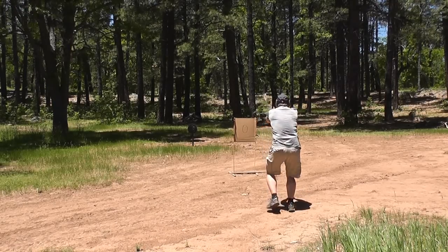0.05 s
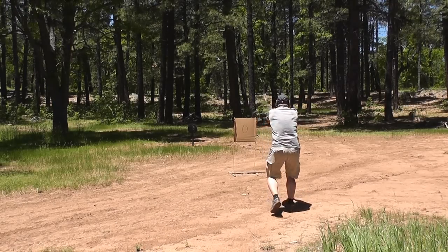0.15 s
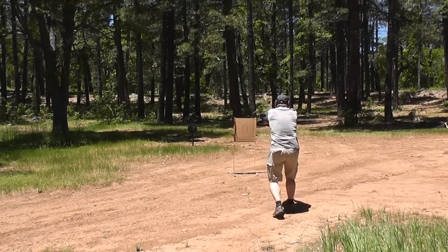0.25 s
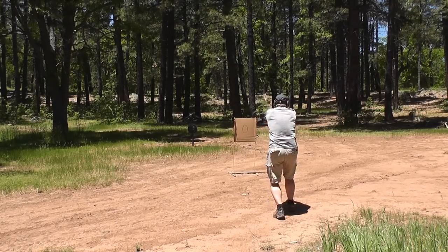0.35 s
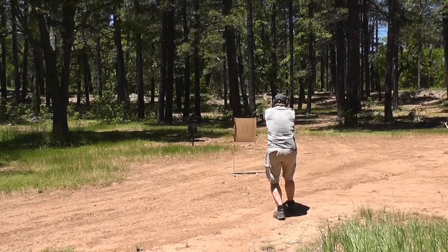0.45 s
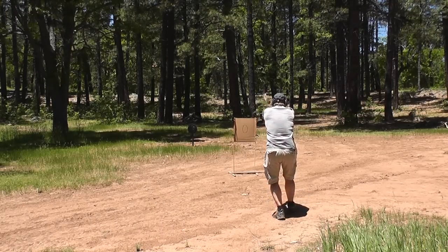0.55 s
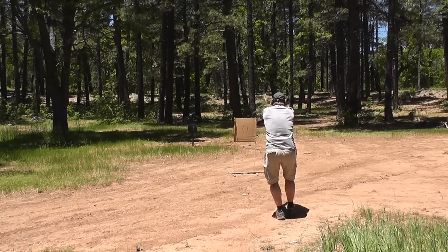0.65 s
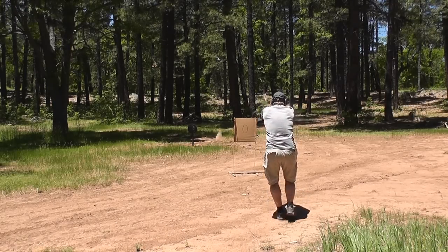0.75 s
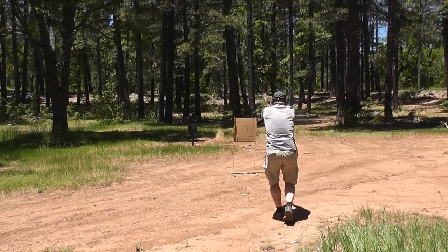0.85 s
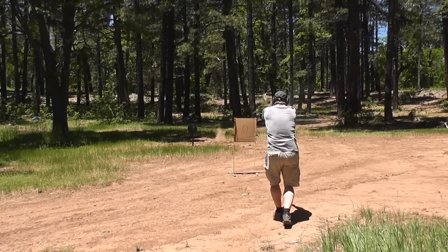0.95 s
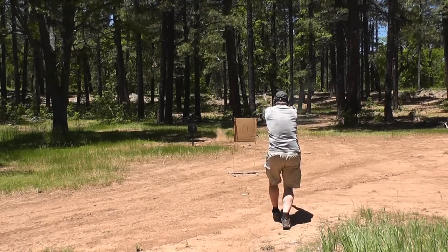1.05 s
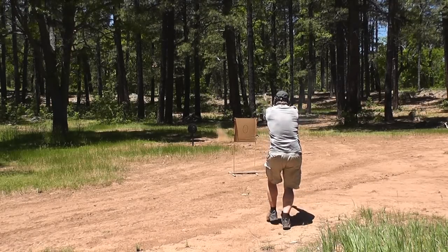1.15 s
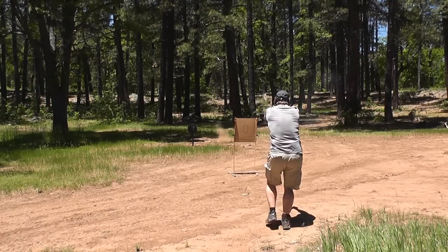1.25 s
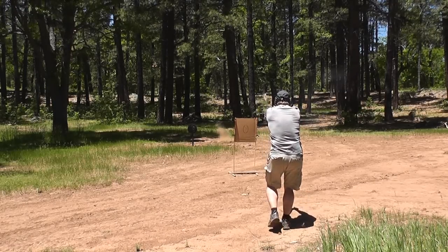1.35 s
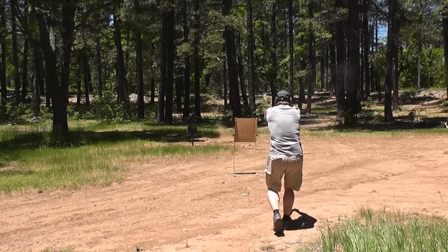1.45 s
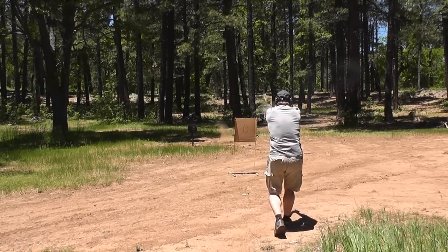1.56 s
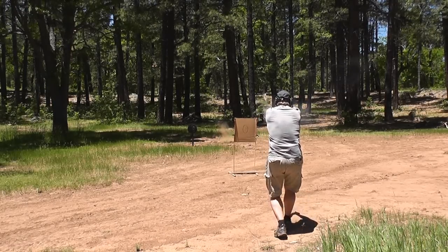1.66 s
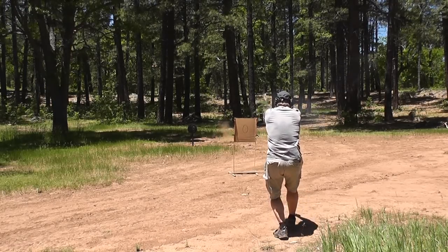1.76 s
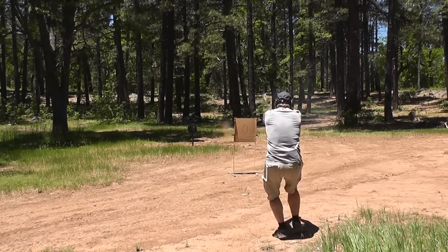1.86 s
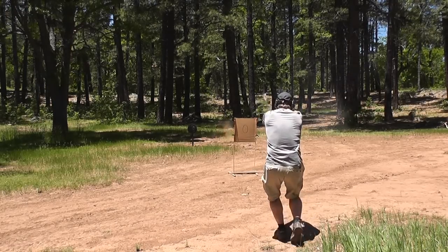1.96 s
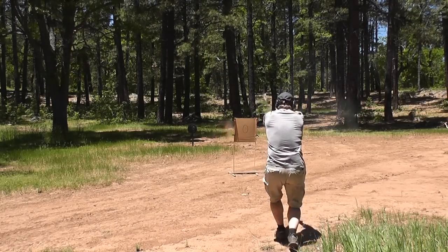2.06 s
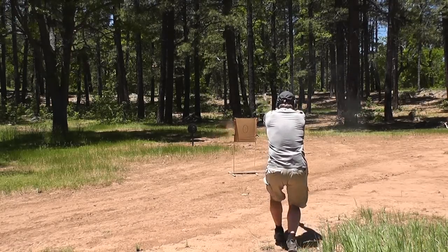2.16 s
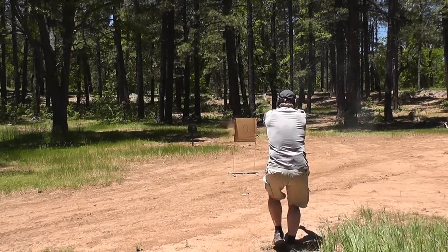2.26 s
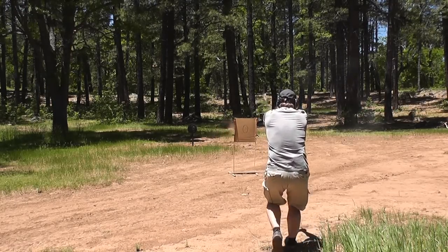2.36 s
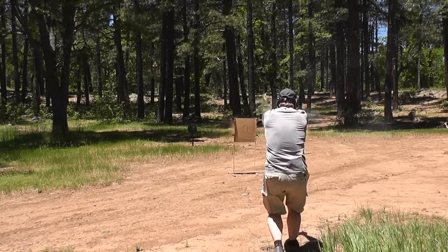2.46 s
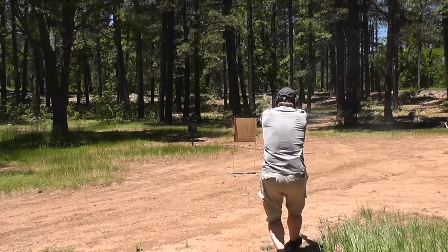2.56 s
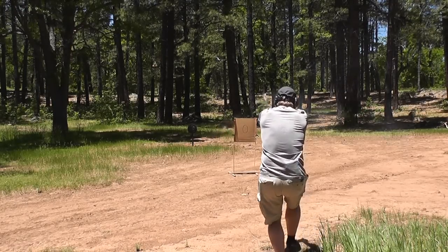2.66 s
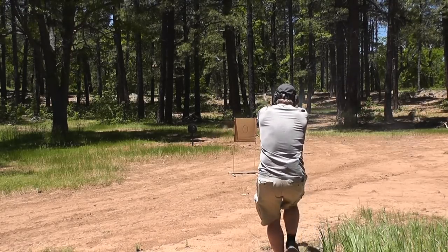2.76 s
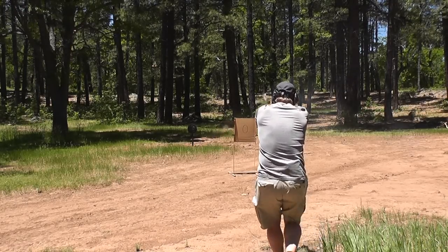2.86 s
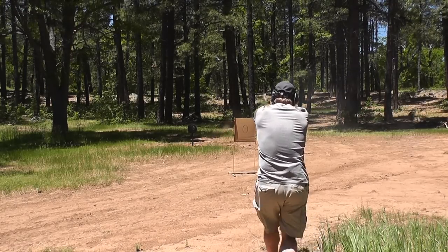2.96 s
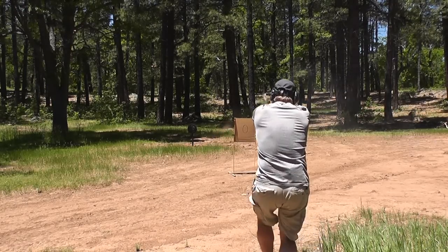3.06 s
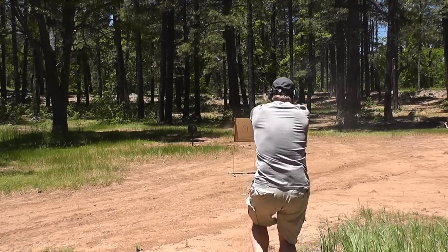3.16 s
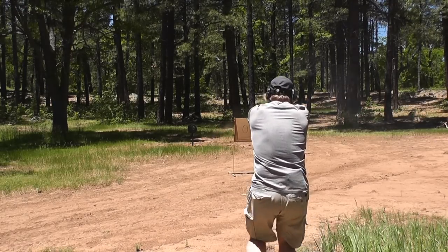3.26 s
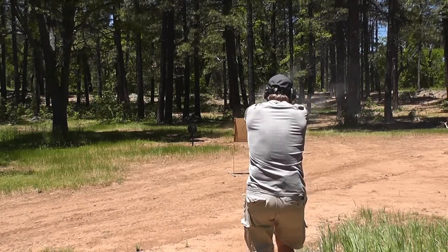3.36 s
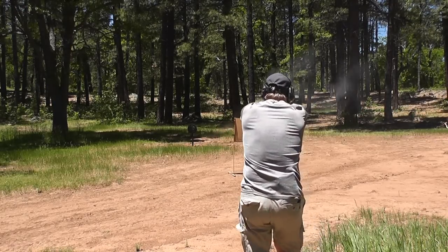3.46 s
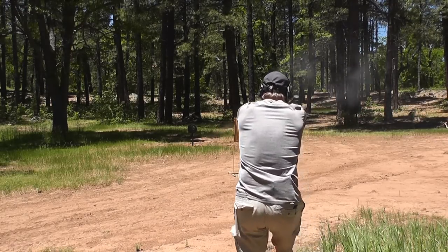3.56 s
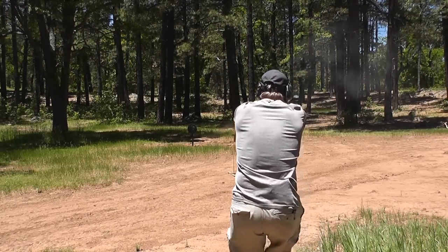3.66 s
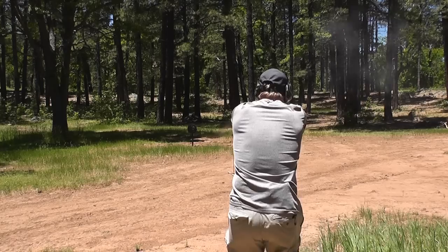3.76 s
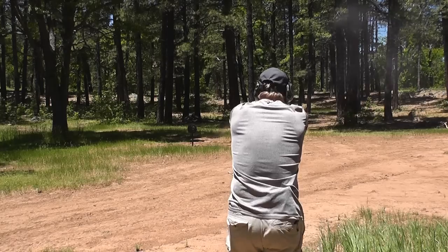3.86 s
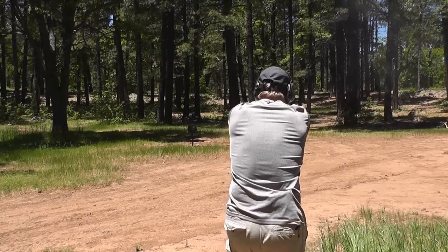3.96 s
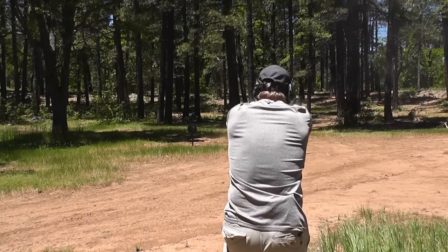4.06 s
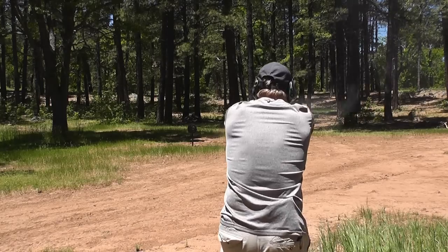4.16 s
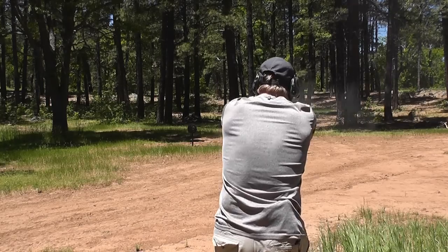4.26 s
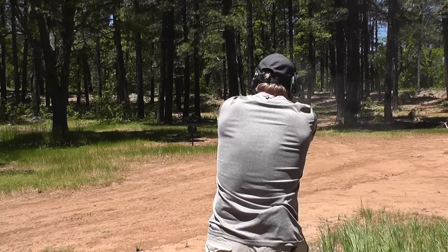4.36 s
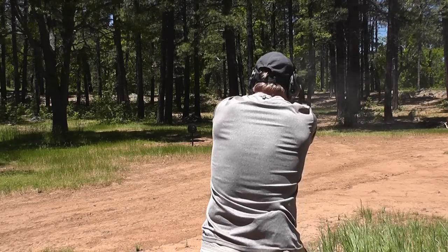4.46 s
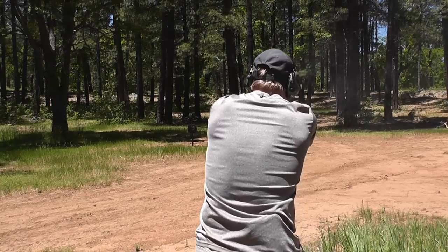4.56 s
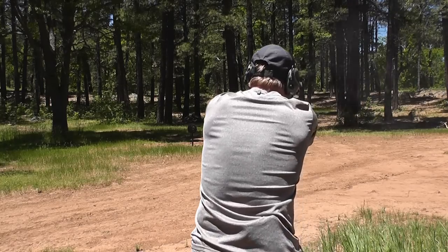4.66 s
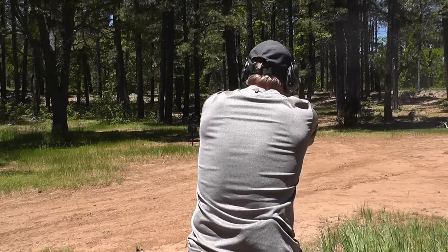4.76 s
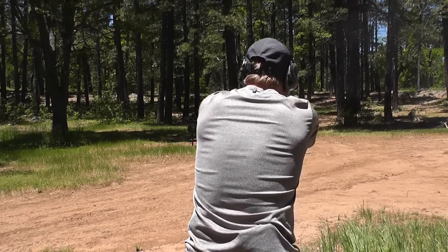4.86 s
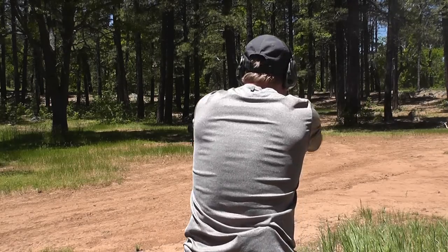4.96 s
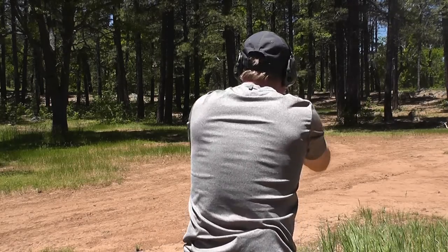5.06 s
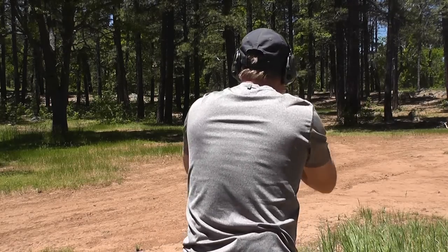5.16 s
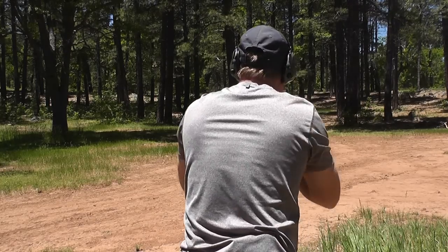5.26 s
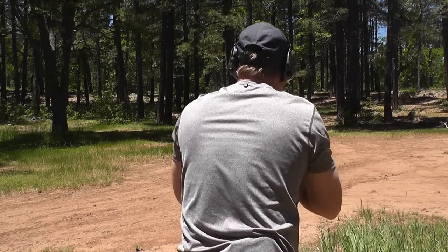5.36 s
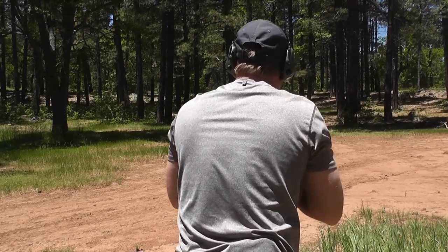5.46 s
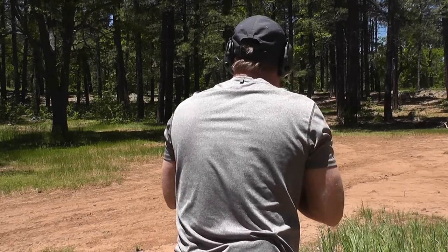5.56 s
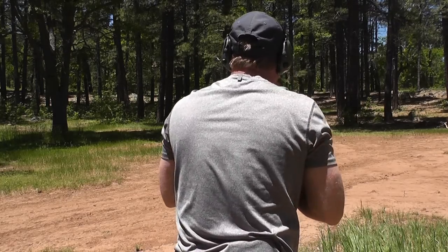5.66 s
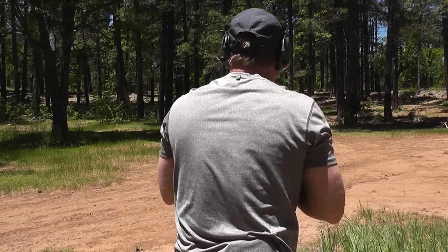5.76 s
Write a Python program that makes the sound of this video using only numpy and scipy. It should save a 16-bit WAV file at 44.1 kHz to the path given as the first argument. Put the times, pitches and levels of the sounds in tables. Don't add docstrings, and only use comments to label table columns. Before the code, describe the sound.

Five dry, clipped gunshots, recorded outdoors on a small camera microphone that ducks after every blast and then recovers. Uneven echoes from trunks swell and decay, each tail cut by the next shot. Soft wind, low buffeting on the microphone and crunching steps fill the gaps; a quick bird trill comes before the first shot, and the last echo fades under near scuffs and cloth rustle.

```python
import sys
import numpy as np
from scipy import signal
from scipy.fft import rfft, irfft
from scipy.io import wavfile
from scipy.ndimage import uniform_filter1d

SR = 44100
rng = np.random.default_rng(int(sys.argv[2]) if len(sys.argv) > 2 else 0)


def wav_out(sig):
    wavfile.write(sys.argv[1], SR, np.round(np.clip(np.atleast_2d(sig).T, -1, 1) * 32767).astype(np.int16))


def voltage_ratio(level):
    return 10 ** (np.asarray(level, float) / 20)


N = 256088
T = np.arange(N) / SR
GRAIN_DECAY_S = 0.00062

FIRED = [
    .7286,
    1.6411,
    2.4856,
    3.3922,
    4.1728,
]


def evened(x):
    return x / np.sqrt(np.mean(x ** 2) + 1e-20)


def read(points, hz):
    f, value = np.transpose(points)
    return np.interp(np.log(hz + 1), np.log(f + 1), value)


def add(mix, s, sound):
    part = mix[:, round(s * SR):][:, :sound.shape[-1]]
    part += sound[..., :part.shape[1]]


def panned(x, pan_db):
    return x * voltage_ratio(np.array([[pan_db / 2], [-pan_db / 2]]))


def coloured(x, points):
    hz = np.fft.rfftfreq(x.shape[-1], 1 / SR)
    return irfft(rfft(x) * voltage_ratio(read(points, hz)), x.shape[-1])


def paired(points, a, b):
    same = np.clip(read(points, np.fft.rfftfreq(len(a), 1 / SR)), -1, 1)
    mid = rfft(a) * np.sqrt(1 + same)
    side = rfft(b) * np.sqrt(1 - same)
    return irfft(np.array([mid + side, mid - side]), len(a)) / np.sqrt(2)


def since_shot():
    return np.min([np.where(T > s, T - s, 9) for s in FIRED], axis=0)


def breeze():
    # frequency in Hz, level in dB.
    pines = [(53, -28), (90, -9), (210, -5.5), (316, -4.5), (345, -2.5), (786, -2), (858, -3.5),
             (2480, -21), (4360, -28), (4860, -32.5), (16000, -48)]
    level_db = -43.5
    a, b, u = rng.standard_normal((3, N))
    hush = evened(coloured(paired([(100, 0.72), (1000, 0.88), (8000, 0.9)], a, b), pines))
    gusts_db = 2.0 * evened(uniform_filter1d(uniform_filter1d(u, 3000), 3000))
    duck_db = np.maximum(25 - 22 * since_shot(), 0)
    hiss = voltage_ratio(-84) * coloured(np.array([a, b])[:, ::-1], [(3000, -5), (13000, -6), (15000, -15)])
    return hush * voltage_ratio(level_db + gusts_db - duck_db) + hiss


def rumble():
    # centre in seconds, level in dB, length in seconds.
    gusts = [
        (0.182, -40, .06),
        (.68, -53, .05),
        (1.56, -56, .07),
        (2.107, -39, 0.26),
        (2.405, -32, 0.13),
        (3.096, -40.5, 0.18),
        (4.11, -59, .05),
        (4.72, -52, .1),
        (4.99, -41, .07),
        (5.45, -43, 0.26),
    ]
    calm_db = -54
    level = voltage_ratio(calm_db) + sum(voltage_ratio(db) * np.exp(-((T - s) / length) ** 2) for s, db, length in gusts)
    eddies = paired([(50, -0.78), (200, -0.33)], *rng.standard_normal((2, N)))
    lumps = coloured(eddies, [(15, -31), (40, -11), (80, -3.0), (130, -11), (300, -67)])
    return evened(lumps) * level * voltage_ratio(-12.0)


def rustle():
    # time in seconds, level in dB.
    walk = [(0, -62.5), (.34, -95), (.6, -73), (1.3, -78), (1.63, -71), (2.2, -63), (2.47, -74),
            (3.08, -65), (3.38, -58), (3.79, -63), (3.94, -59.5), (4.16, -63), (4.65, -60), (4.75, -69),
            (4.95, -60.5), (5.3, -58), (5.8, -66.5)]
    # start in seconds, length in seconds, level in dB.
    scuffs = [(0, 0.011, -49), (0.324, 0.02, -46.5), (0.38, 0.023, -62), (0.588, 0.051, -54),
              (1.452, 0.012, -48), (1.598, 0.013, -49), (2.08, 0.062, -38.5), (2.248, 0.017, -58.5),
              (2.387, 0.079, -63), (2.99, 0.034, -44), (3.035, 0.047, -55), (3.166, 0.015, -54),
              (3.237, 0.023, -49), (3.284, 0.035, -56), (3.328, 0.2, -51.5), (3.748, 0.013, -63),
              (3.776, .015, -44), (3.885, 0.039, -45), (3.936, 0.044, -47), (4.065, 0.16, -68),
              (4.622, 0.066, -52), (4.797, 0.055, -59), (4.963, 0.088, -49.5), (5.13, 0.083, -53),
              (5.213, 0.1, -59), (5.06, .06, -64), (5.49, .15, -80), (5.682, 0.03, -42), (5.72, 0.062, -53)]
    # frequency in Hz, level in dB.
    far_grit = [(1470, -37), (2500, -19), (2790, 2.5), (3800, 2), (4910, -4), (6450, 2.5), (8000, -3.5),
                (9500, -3), (11900, -3), (14000, -8), (16000, -12)]
    # frequency in Hz, level in dB.
    near_cloth = [(2060, -38), (3500, -11), (4240, -17), (4780, -2), (5500, 1), (7800, -7), (9300, 0.5),
                  (12000, -10), (14000, -3), (16000, -7)]
    duck_db, duck_s = 40, 0.3
    close_from_s, close_by_s = 3.8, 5.7
    crackles_per_s, crackle_db = 55, 8.5

    level = voltage_ratio(np.interp(T, *np.transpose(walk)) - duck_db * (since_shot() < duck_s))
    for s, length, db in scuffs:
        times = [s, s + 0.0043, s + 0.7 * length, s + 1.38 * length]
        level = level + voltage_ratio(db) * np.interp(T, times, [0.0012, 0.5, 0.55, 0.0002])
    a, b, u = rng.standard_normal((3, N))
    clumps = voltage_ratio(3.3 * evened(uniform_filter1d(u, 45)))
    raw = paired([(3000, 1.0), (9500, 1.0), (13000, 0.96)], a, b) * clumps
    close = np.interp(T, [close_from_s, close_by_s], [0, 1])
    distant_grains = evened(coloured(raw, [(1200, -40)] + far_grit))
    close_grains = evened(coloured(raw, [(1500, -30)] + near_cloth))
    grains = (1 - close) * distant_grains + close * close_grains
    ticks = (rng.random(N) < crackles_per_s / SR) * rng.uniform(0.18, 1, N) * level
    bursts = signal.lfilter([voltage_ratio(crackle_db)], [1, -np.exp(-1 / (GRAIN_DECAY_S * SR))], ticks)
    return evened(grains) * (uniform_filter1d(level, 100) + bursts) * voltage_ratio(1.5)


def note(s, length, start_hz, end_hz, db):
    u = np.linspace(0, 1, round(length * SR))
    bend = 2.5 if end_hz > start_hz else 1.1
    hz = start_hz + (end_hz - start_hz) * (1 - (1 - u) ** bend)
    db = db + 1.2 * evened(uniform_filter1d(rng.standard_normal(len(u)), size=40))
    whistle = np.sin(2 * np.pi * np.cumsum(hz) / SR)
    return s, panned(voltage_ratio(db) * whistle * np.sin(np.pi * u) ** 0.7, 5.6)


def snap(s, db, hz):
    t = np.arange(512) / SR
    band = np.exp(-((np.fft.rfftfreq(512, 1 / SR) / hz - 1) / 0.16) ** 2) + 0.27
    noise = irfft(rfft(rng.standard_normal(512)) * band)
    tick = coloured(noise, [(hz / 5, -30), (hz / 2.3, 0)])
    fade = np.exp(-t / GRAIN_DECAY_S)
    loudness = voltage_ratio(db - 4.5) * np.sqrt(np.mean(fade ** 2))
    return s, panned(loudness * evened(tick * fade), 2.0 * rng.standard_normal())


def puff(s, db, hz, length):
    t = np.arange(4096) / SR
    low = [(hz / 8, -50), (hz / 3, -20), (hz, 0)]
    high = [(hz * 3, -12), (hz * 12, -34), (max(16000, hz * 13), -50)]
    thud = coloured(rng.standard_normal(4096), low + high)
    return s, voltage_ratio(db) * evened(thud) * np.clip(t / 0.0064, 0, 1) * np.exp(-(t / length) ** 2)


def blast(s, db, length, shock_db, near_db, pan_db, ground_s, ground_db):
    # frequency in Hz, level in dB.
    slam_spectrum = [(120, -34), (200, -5), (558, -21), (800, -1.5), (1020, 1), (1500, -1), (3020, -12.5),
                     (5840, -11), (11700, -29), (16000, -15.5)]
    # frequency in Hz, level in dB.
    tail_spectrum = [(120, -22), (200, -6), (440, 6.5), (1910, 1.5), (5330, -9.5), (6760, -3),
                     (8740, -10.5), (12200, -7), (16000, -23)]
    lead_s = .003
    t = np.arange(2048) / SR - lead_s
    a, b, c, d = rng.standard_normal((4, len(t)))

    pressure = paired([(1500, 0.037), (5000, 0.99), (9000, 0.96), (13000, .6)], a, b)
    slam = np.tanh(0.5 * evened(coloured(pressure, slam_spectrum))) / 0.67
    slam *= np.interp(t, [0, .0003, length, length + 0.0012], [0, 1, 1, 0])

    sizzle = np.diff(uniform_filter1d(c, size=3), prepend=0)
    lead = voltage_ratio(-18) * np.clip(1 + t / 0.0019, 0, 1) * (t < 0)
    lead_hiss = evened(uniform_filter1d(sizzle, size=6)) * lead
    crack = voltage_ratio(shock_db) * np.sin(2 * np.pi * 6200 * t) * np.exp(-abs(t - .0002) / 0.00011)
    shock = voltage_ratio(shock_db) * np.exp(-np.maximum(t, 0) / 0.0006) * (t >= 0)
    shock = shock + voltage_ratio(ground_db) * np.exp(-((t - ground_s) / 0.00047) ** 2)

    near = evened(coloured(paired([(500, 0.63), (9000, 0.86)], c, d), tail_spectrum))
    dull = coloured(near, [(4000, -1.5), (9000, -3)])
    near = dull + (near - dull) * voltage_ratio(-500 * np.maximum(t - length, 0))
    near *= voltage_ratio(near_db - 625 * (t - length)) * np.clip((t - length + 0.00236) / 0.00018, 0, 1)
    hiss = lead_hiss + evened(sizzle) * voltage_ratio(-1.5) * shock
    return s - lead_s, panned(voltage_ratio(db) * slam, pan_db) + hiss + crack + near


def swing(s, ring_s, kick_db, slow_db, slow_hz, slow_s, ring_db, ring_hz, pan_db):
    t = np.arange(2048) / SR
    late = np.maximum(t - slow_s, 0)
    slow = -voltage_ratio(slow_db) * np.sin(2 * np.pi * slow_hz * late) * np.exp(-late / 0.0034)
    slow = signal.lfilter(*signal.butter(1, 40 / (SR / 2), "high"), slow)
    ring = voltage_ratio(ring_db) * np.cos(2 * np.pi * ring_hz * (t - ring_s))
    ring *= np.clip(1 + (t - ring_s) / 0.00075, 0, 1)
    ring *= np.exp(-(np.maximum(t - ring_s, 0) * ring_hz / 0.99) ** 3)
    kick = -voltage_ratio(kick_db) * np.sin(2 * np.pi * np.minimum(230 * t, 1))
    return s, panned(slow, -3.5) + ring * voltage_ratio(np.array([[pan_db], [0]])) + kick * np.array([[1], [-.2]])


def returning(late, edge_db, swell_db, fall_db, rise_s):
    clearing_db, clearing_rise_db_per_s, edge_fall_db_per_s = -35, 102, 260
    swell_from_db, swell_s = -7, 0.11
    stand_s, stand_step_db = 0.23, -1
    thin_s, thin_db_per_s = 0.65, 10.5
    on = np.clip(1 + late / rise_s, 0, 1) ** 1.7
    clearing = voltage_ratio(clearing_db + clearing_rise_db_per_s * np.minimum(late, 0))
    edge = voltage_ratio(edge_db - edge_fall_db_per_s * np.maximum(late, 0))
    far = np.maximum(late - stand_s, 0)
    swell = swell_db + swell_from_db * np.clip(1 - late / swell_s, 0, 1)
    swell = swell + stand_step_db * np.minimum(far / 0.029, 1)
    swell = voltage_ratio(swell - fall_db * far - thin_db_per_s * np.maximum(late - thin_s, 0))
    return (1 - on) * clearing + on * np.hypot(edge, swell)


def woods(shot, until, air_share, trees_s, *levels):
    # frequency in Hz, level in dB.
    tree_line = [(35, -64), (60, -16), (207, -13), (408, -8.5), (682, -2), (822, -4), (991, -1.5),
                 (1850, -5), (2520, -14), (2900, -8), (3760, -11), (4640, -15), (5720, -17), (10800, -25.5),
                 (16000, -35)]
    # frequency in Hz, loss in dB per second of path.
    air_loss = [(100, 1.5), (300, 8.5), (800, -2.5), (1500, 3), (2000, 13.5), (3000, 21), (5000, 56),
                (8000, 93), (13000, 119), (16000, 200)]
    # frequency in Hz, left-right likeness (-1 to 1).
    likeness = [(60, -1.24), (180, 0.51), (550, 0.83), (1650, 0.66), (3500, 0.88), (5000, 0.96),
                (7500, .997), (10500, 0.96), (13000, 0.56), (15000, 0.49)]
    t = np.arange(shot + .015, until, 1 / SR)
    a, b, u = rng.standard_normal((3, len(t)))
    uneven_db = 1.3 + 2.1 * np.exp(-(t - shot) / .35)
    size = voltage_ratio(uneven_db * evened(uniform_filter1d(u, 60)))
    size /= np.sqrt(uniform_filter1d(size ** 2, 1500))
    pair = paired(likeness, a, b)
    hz, at, z = signal.stft(np.array([pair * size, pair * size ** .3]), SR, nperseg=512, noverlap=384)
    leafy = np.clip(read([(3000, 0.091), (7000, 0.87)], hz), 0, 1)[:, None]
    z = (1 - leafy) * z[0] + leafy * z[1]
    path = np.maximum(at - .09, 0)
    path /= 1 + path / 11.5
    shape = voltage_ratio(read(tree_line, hz)[:, None] - read(air_loss, hz)[:, None] * path * air_share)
    shape /= np.sqrt((shape[6:24] ** 2).sum(0) / len(hz))
    wash = signal.istft(z * shape, SR, nperseg=512, noverlap=384)[1][:, :len(t)]
    wash = coloured(wash, [(50, -40), (110, 1)])
    level = returning(t - shot - trees_s, *levels)
    return t[0], wash * level * signal.windows.tukey(len(t), .006)


def trunk(s, db, hz, pan_db, bright=0.2):
    t = np.arange(300) / SR
    peak_s = .0006
    shape = (t / peak_s) * np.exp(1 - t / peak_s)
    edge = bright * uniform_filter1d(uniform_filter1d(rng.standard_normal(len(t)), size=4), size=3)
    ring = 0.27 * np.sin(2 * np.pi * hz * t) * np.exp(-t / 0.0025) * np.clip(1 - t / t[-1], 0, 1)
    slap = (np.cos(2 * np.pi * hz * (t - peak_s)) + edge) * shape
    echo = np.pad(coloured(slap + ring, [(200, -45), (600, 0.5)]), (0, 600))
    echo = signal.lfilter(*signal.butter(2, 200 / (SR / 2), "high"), echo)
    return s, panned(voltage_ratio(db + 2.5) * echo, pan_db)


def shots(mix):
    # overload in dB, its length in seconds, shock in dB, near tail in dB, pan in dB.
    blasts = [(-10.5, 0.0039, -7.5, -16, -1), (-13, 0.00353, -13, -16, 6), (-5, 0.0033, -10, -18.5, 2),
              (-7.5, 0.0054, -5, -21.5, 1), (-10.5, 0.0056, -10.5, -20.5, -7.5)]
    # delay in seconds, level in dB, kick in dB.
    bounces = [(.002, -20, -22), (.002, -13, -25), (.0022, -13, -9), (.0031, -27, -19.5), (.0033, -16, -31)]
    # slow swing in dB, its Hz, its delay in seconds, ring in dB, its Hz, its pan in dB.
    diaphragms = [(-9, 115, .0034, -7, 640, -14), (-10, 115, .0038, -12, 520, -8),
                  (-8.5, 120, .0042, -8, 600, -14), (-13, 120, .0045, -4.5, 500, -18),
                  (-9.5, 120, .0052, -5, 350, -14)]
    ring_peaks = [.0018, .0018, .0024, .0016, .0019]
    # target board echo delay in seconds, its level in dB,
    # tree line delay in seconds, its level in dB, forest swell in dB.
    echoes = [(0.0179, -11, 0.078, -24, -25.5), (0.0214, -11.5, 0.076, -26.5, -25),
              (0.027, -13.5, 0.083, -26, -25), (0.0334, -18, .088, -27, -26),
              (.0388, -21, 0.096, -28.5, -26)]
    # board rattle in dB, bank boom in dB, fall of the far forest in dB per second,
    # share of the air loss (0 to 1), rise of the tree line in seconds.
    distances = [(-28, -32.5, 9.5, 0.95, 0.0076), (-15, -30, 9, 0.99, 0.011),
                 (-16.5, -39, 10.5, 0.99, 0.0088), (-22, -31, 9, 0.98, 0.014),
                 (-25, -30.5, 9.5, 0.93, 0.026)]
    ends = [s + .002 for s in FIRED[1:]] + [N / SR]
    rows = zip(FIRED, ends, ring_peaks, blasts, bounces, diaphragms, echoes, distances)
    for s, end, ring_s, shot, ground, swings, echo, far in rows:
        board_s, board_db, trees_s, edge_db, swell_db = echo
        rattle_db, boom_db, fall_db, air_share, rise_s = far
        add(mix, *blast(s, *shot, *ground[:2]))
        add(mix, *swing(s, ring_s, ground[2], *swings))
        add(mix, *woods(s, end, air_share, trees_s, edge_db, swell_db, fall_db, rise_s))
        add(mix, *trunk(s + board_s, board_db, hz=1240, pan_db=-1, bright=0.41))
        add(mix, *snap(s + 1.275 * board_s, rattle_db, hz=9000))
        add(mix, *puff(s + .208, boom_db, hz=226, length=0.026))


def ping(s, db, hz, t60):
    t = np.arange(2048) / SR
    modes = np.sin(2 * np.pi * hz * t) + 0.54 * np.sin(2 * np.pi * 1.1 * hz * t)
    return s, voltage_ratio(db - 60 * t / t60) * modes


def scene():
    # start in seconds, length in seconds, start in Hz, end in Hz, level in dB.
    trill = [(.266, .032, 4700, 3300, -60), (0.467, .045, 4900, 3400, -59), (.47, .03, 6500, 5600, -63),
             (.36, .013, 4900, 4400, -58), (.498, .01, 7800, 6500, -61), (0.549, .015, 3300, 4200, -50.5),
             (.55, .012, 4300, 5770, -57), (.572, .015, 4600, 5900, -56), (0.596, .013, 5000, 5850, -56),
             (.616, .012, 5100, 5700, -57), (0.638, .015, 4700, 5400, -54), (.66, 0.017, 4200, 4950, -51),
             (0.685, .016, 3580, 4670, -50), (0.713, 0.011, 3400, 4400, -46)]
    # start in seconds, level in dB, pitch in Hz.
    twigs = [(0.328, -33, 5820), (.3386, -31, 5860), (0.357, -35, 4200), (.4614, -38, 6000),
             (1.1244, -31, 4700), (1.458, -27, 7500), (2.0807, -35, 4890), (2.115, -18, 4200),
             (2.2495, -31.5, 8010), (2.9971, -29, 6380), (3.0383, -27, 7150), (3.263, -28, 4230),
             (3.2979, -35, 9880), (3.7495, -20, 6330), (3.7843, -23, 6180), (3.889, -27, 5900),
             (3.963, -26, 9850), (4.027, -31, 6420), (4.6844, -28, 4150), (4.78, -28.5, 10300),
             (4.95, -25.5, 6900), (4.975, -26, 5630), (5.1403, -31, 8840), (5.1837, -26, 6570),
             (5.234, -33, 13000), (5.3062, -27, 4840), (5.3504, -31, 4960), (5.4764, -30.5, 5920),
             (5.738, -33, 5990), (5.756, -30, 5900), (5.691, -31, 2000), (5.699, -32, 1900),
             (5.709, -31, 2300), (5.738, -29, 2200), (5.756, -27, 1800), (5.768, -38, 2800),
             (5.779, -38, 2300), (3.235, -37, 4300), (3.246, -36, 4000), (3.298, -35, 4200),
             (3.351, -36, 4200), (3.174, -37, 4500), (.4614, -38, 2800), (.357, -42, 2200)]
    # start in seconds, level in dB, pitch in Hz, length in seconds.
    footfalls = [
        (0.329, -46, 900, 0.036),
        (0.391, -48.5, 1500, 0.033),
        (0.609, -52, 2000, 0.024),
        (2.999, -28, 262, 0.012),
        (5.688, -41, 1270, 0.038),
        (5.748, -41.5, 1950, 0.014),
    ]
    # arrival in seconds, level in dB, pitch in Hz, pan in dB.
    large_trunks = [(.804, -20, 1460, 2), (0.866, -16.5, 1300, -2), (0.886, -17, 1440, -2),
                    (.953, -12, 1180, -8), (.993, -12, 1280, 1), (1.074, -14, 1420, 2),
                    (1.718, -16, 1210, 3), (1.762, -18, 1220, -4), (1.803, -14, 1230, -6),
                    (1.87, -9.5, 1340, -9), (1.91, -16, 1010, 1.5), (1.918, -28, 720, -4),
                    (1.982, -14.5, 1170, 1), (2.567, -17, 1530, 5), (2.634, -13, 1110, -3),
                    (2.653, -16, 1240, -5), (2.690, -17, 1050, -8), (2.719, -21, 945, -6),
                    (2.759, -13, 1000, 6), (3.449, -25, 931, -.5), (3.488, -13.5, 1260, 8),
                    (3.526, -22, 1590, -3), (3.546, -13, 1040, -1), (3.565, -17.5, 1480, -2.5),
                    (3.603, -14.5, 830, -7), (3.633, -9, 1100, -4), (3.751, -8.5, 1240, 2),
                    (4.263, -23, 1300, 12), (4.275, -27, 1500, 0), (4.312, -25, 1100, 0),
                    (4.332, -15.5, 1460, -1), (4.419, -16.5, 1310, -7), (4.455, -15, 706, 1.5),
                    (4.53, -26, 1000, 0), (4.539, -13.5, 1270, 2), (2.722, -15, 1210, 0),
                    (2.841, -13, 1120, 2), (3.671, -18, 1100, 0), (.770, -38, 1200, 0),
                    (.785, -31, 1300, 0), (.811, -16, 1100, 0), (1.727, -14.5, 1210, 1),
                    (1.783, -18, 1200, -3), (3.477, -19, 1201, 0), (4.231, -34, 1200, 0),
                    (2.543, -29, 900, 0), (2.698, -20, 900, -2), (2.576, -17, 1000, 0)]
    # start in seconds, level in dB, pitch in Hz.
    faint_grains = [(1.07, -36, 9000), (1.442, -46, 11000), (1.485, -45, 11000), (2.189, -32, 5930),
                    (2.23, -36, 5940), (2.311, -46, 9000), (2.384, -46, 6470), (2.408, -38, 8000),
                    (2.423, -40, 7000), (2.456, -41, 9000), (3.123, -38, 6000), (3.173, -37, 6010),
                    (3.209, -44, 6110), (3.234, -38, 5600), (3.246, -38, 6150), (3.3365, -31, 6000),
                    (3.819, -32, 5100), (3.8625, -39, 11300), (4.068, -38, 6900), (4.105, -35, 6980),
                    (4.617, -39, 9000), (4.726, -38, 7000), (4.8, -36, 8000), (4.843, -35, 8040),
                    (4.982, -36, 10000), (5.029, -33, 9500), (5.157, -42, 13000), (5.178, -31, 6000),
                    (5.291, -35, 10000), (5.328, -32, 5100), (5.37, -36, 13500), (5.384, -39, 12000),
                    (5.43, -35, 5470), (5.56, -46, 6370), (5.69, -35, 7040), (5.697, -39, 5400),
                    (5.779, -28.5, 6380)]
    # start in seconds, level in dB, pitch in Hz, 60 dB decay in seconds.
    stones = [
        (1.458, -35, 4600, 0.022),
        (5.4764, -46, 5600, .012),
    ]
    # start in seconds, level in dB, pitch in Hz.
    scuff_grains = [(2.296, -46, 7000), (2.776, -38, 12000), (2.809, -37, 11000), (2.904, -49, 13000),
                    (3.008, -30, 6500), (3.018, -36, 7500), (3.022, -37, 9000), (3.047, -36, 6500),
                    (3.050, -34, 5800), (3.071, -42, 9000), (3.080, -43, 8000), (3.219, -44, 8200),
                    (3.254, -40, 10000), (3.291, -39, 7000), (3.307, -37, 9000), (3.320, -38, 8000),
                    (3.351, -38, 9000), (3.361, -35, 7500), (3.377, -34, 6700), (3.385, -30, 4200),
                    (3.738, -40, 12000), (3.954, -36, 10000), (3.970, -35, 7500), (4.000, -38, 10000),
                    (4.127, -38, 8000), (4.148, -39, 6600), (4.160, -38, 6000), (4.590, -42, 12000),
                    (4.676, -30, 8000), (4.700, -39, 8500), (4.986, -38, 5500), (5.014, -38, 9000),
                    (5.144, -34, 8500), (5.172, -40, 7000), (5.207, -41, 13000), (5.225, -34, 5000),
                    (5.243, -40, 9500), (5.283, -41, 12000), (5.375, -35, 7000), (5.386, -37, 8500),
                    (5.392, -41, 8000), (5.399, -42, 7000), (5.434, -39, 5500), (5.514, -44, 6000),
                    (5.710, -41, 4500), (5.771, -36, 4200), (5.795, -43, 13000), (5.805, -35, 5500)]
    mix = breeze() + rumble() + rustle()
    shots(mix)
    events = [(note, trill), (snap, twigs), (puff, footfalls), (trunk, large_trunks),
              (snap, faint_grains), (ping, stones), (snap, scuff_grains)]
    for source, table in events:
        for row in table:
            add(mix, *source(*row))
    return mix


def band_limit(x):
    return signal.sosfilt(signal.butter(12, 16980, fs=SR, output="sos"), x)


def record(dry):
    hz, _, z = signal.stft(np.tanh(dry), SR, nperseg=1024, noverlap=768)
    power = (abs(z) ** 2).mean(0)
    all_db = 10 * np.log10(power.sum(0) + 1e-14)
    top_db = 10 * np.log10(power[(hz > 13000) & (hz < 15800)].sum(0) + 1e-14)
    kept = np.clip((top_db - np.maximum(all_db - 48, -90)) / 7., 0, 1)
    edge_hz = 14600 + 1150 * uniform_filter1d(kept, size=5)
    z = z * voltage_ratio(-.2 * np.maximum(hz[:, None] - edge_hz, 0))
    notch_hz, notch_width_hz, notch_db = 2520, 30, -6
    z = z * voltage_ratio(notch_db * np.exp(-((hz[:, None] - notch_hz) / notch_width_hz) ** 2))
    finished = signal.istft(z, SR, nperseg=1024, noverlap=768)[1][:, :N]
    return band_limit(finished)


dry = scene()
out = record(dry)
wav_out(out)
```